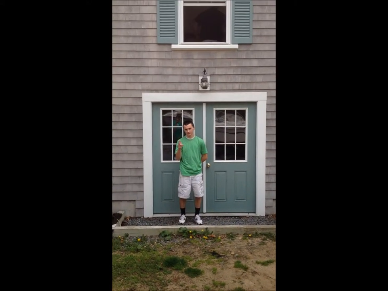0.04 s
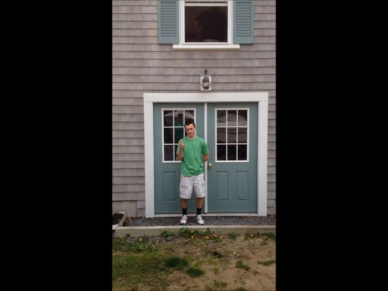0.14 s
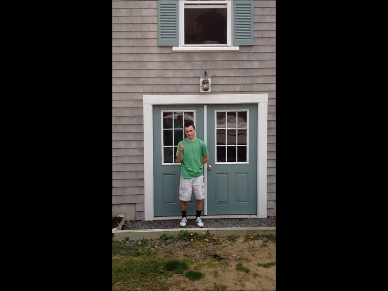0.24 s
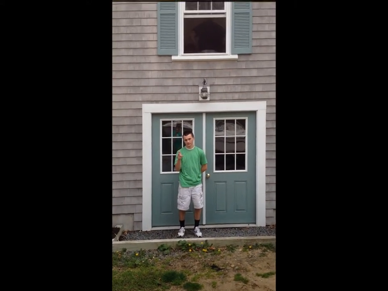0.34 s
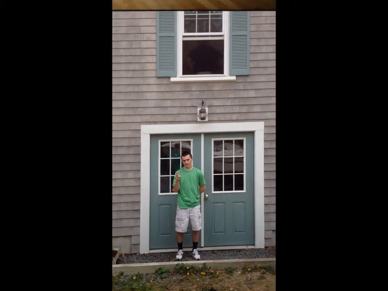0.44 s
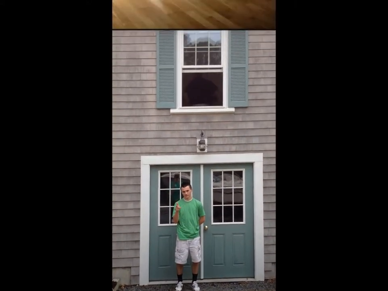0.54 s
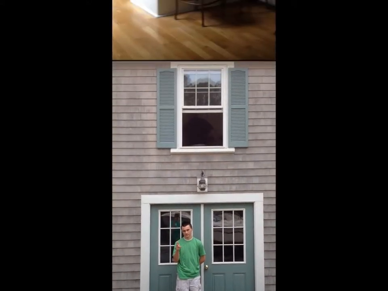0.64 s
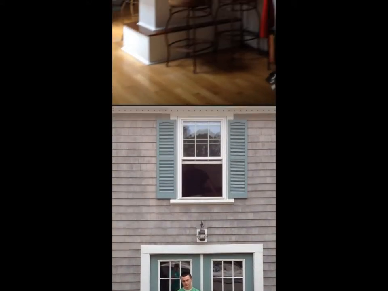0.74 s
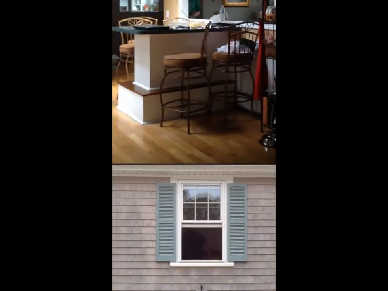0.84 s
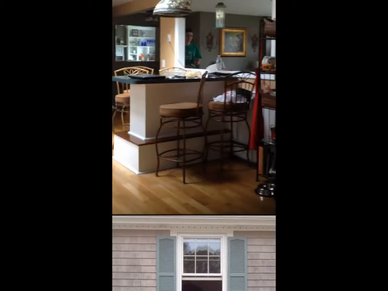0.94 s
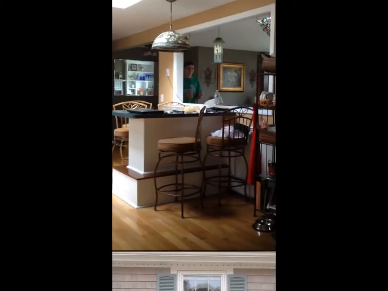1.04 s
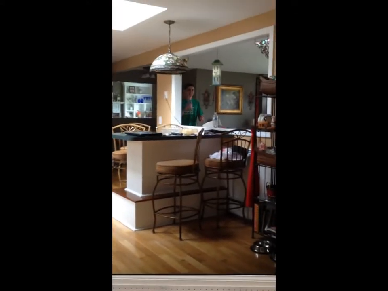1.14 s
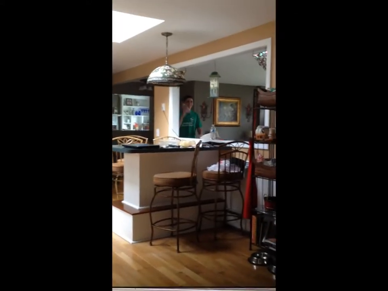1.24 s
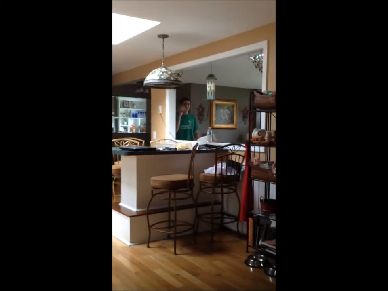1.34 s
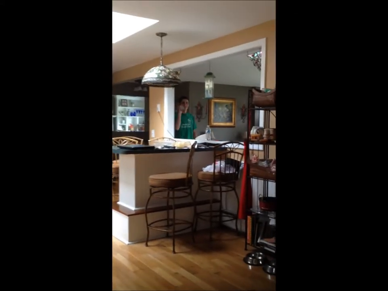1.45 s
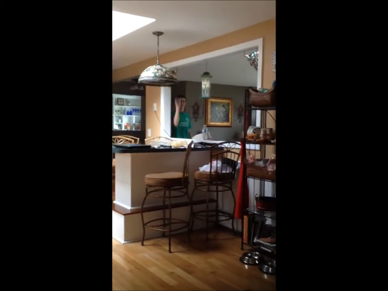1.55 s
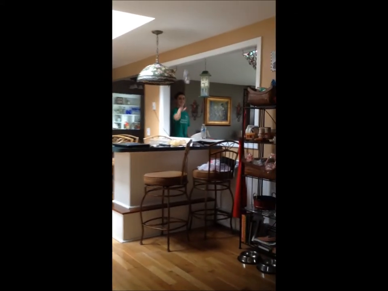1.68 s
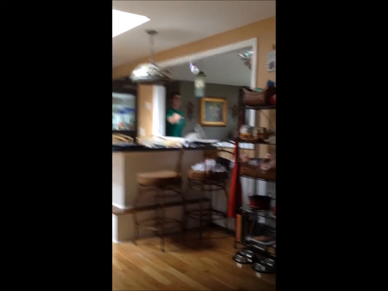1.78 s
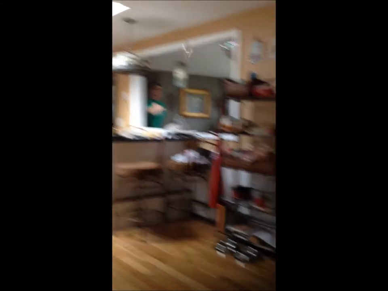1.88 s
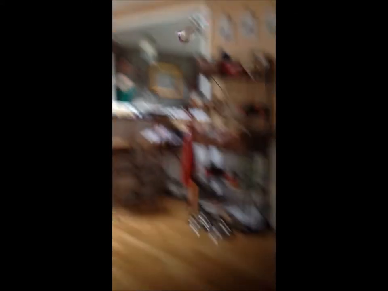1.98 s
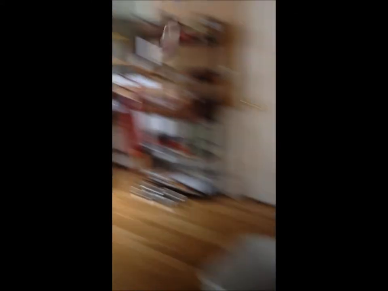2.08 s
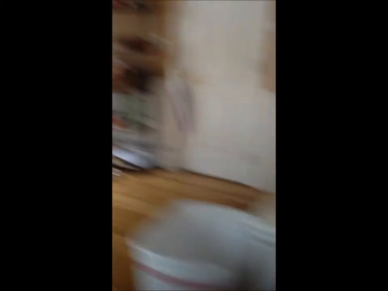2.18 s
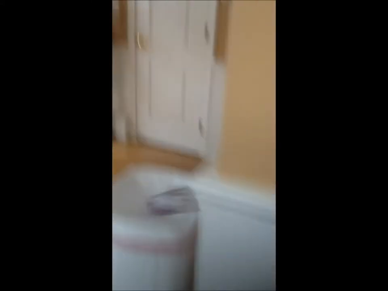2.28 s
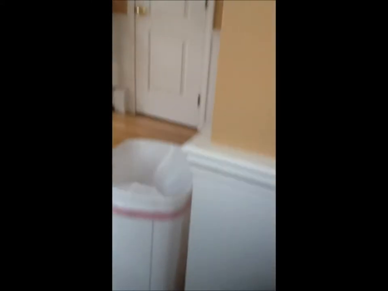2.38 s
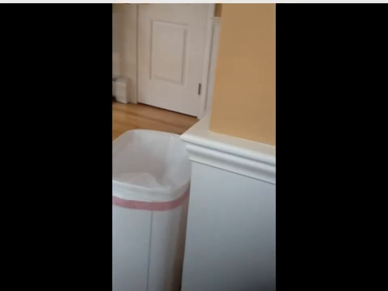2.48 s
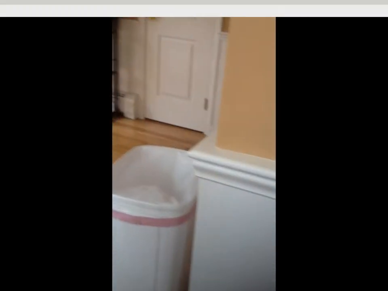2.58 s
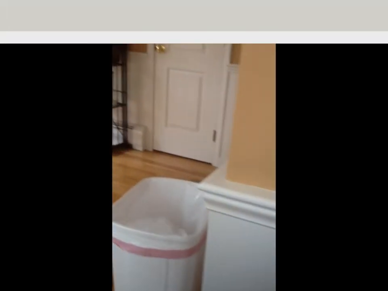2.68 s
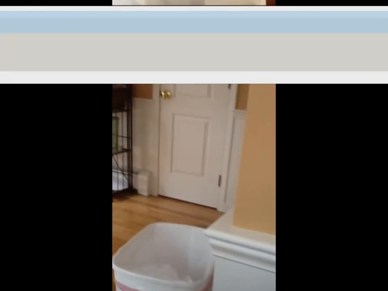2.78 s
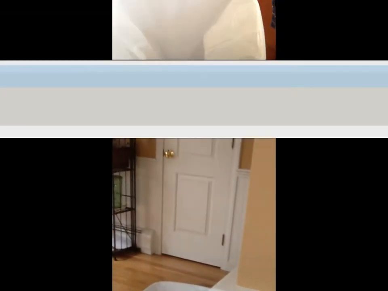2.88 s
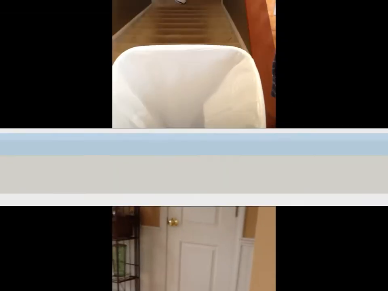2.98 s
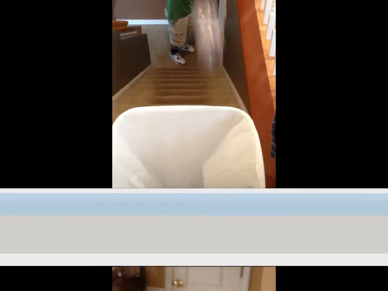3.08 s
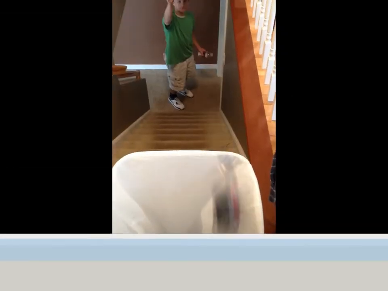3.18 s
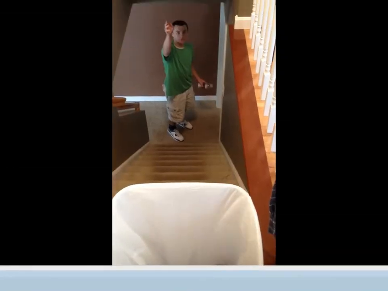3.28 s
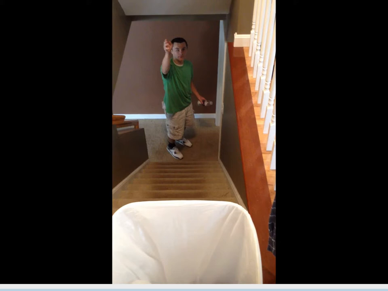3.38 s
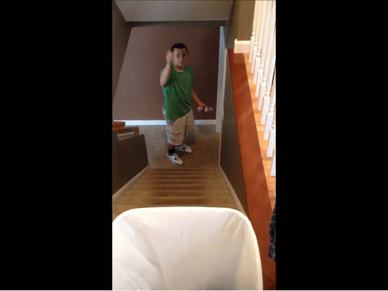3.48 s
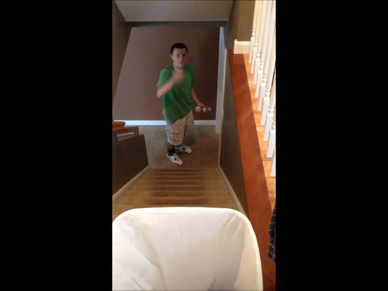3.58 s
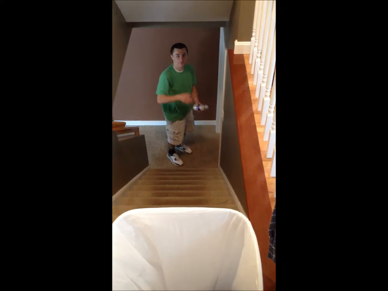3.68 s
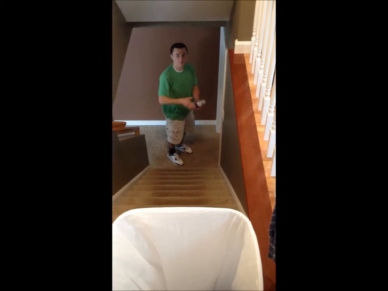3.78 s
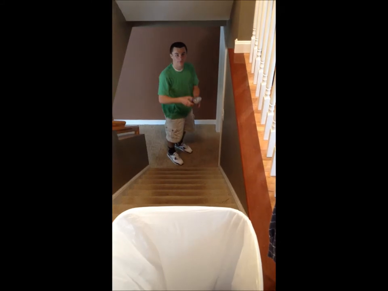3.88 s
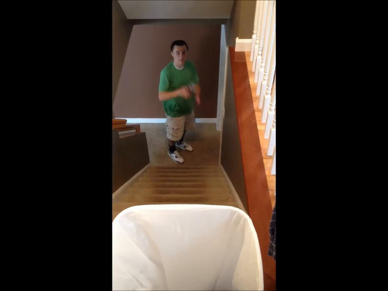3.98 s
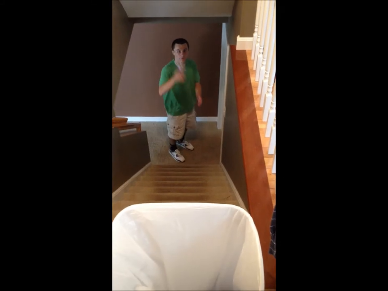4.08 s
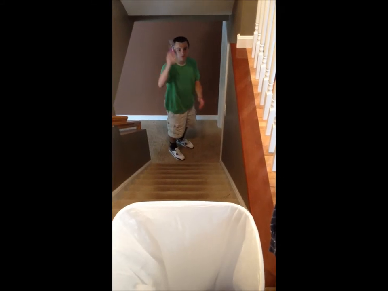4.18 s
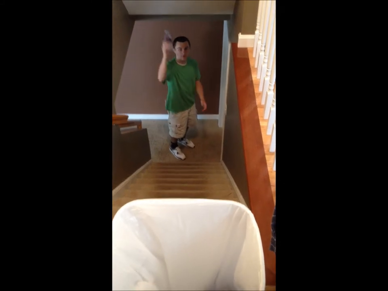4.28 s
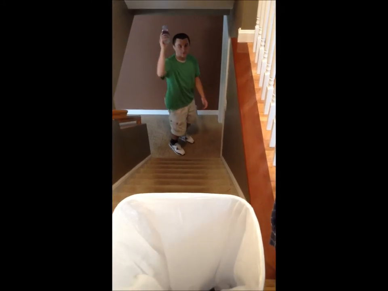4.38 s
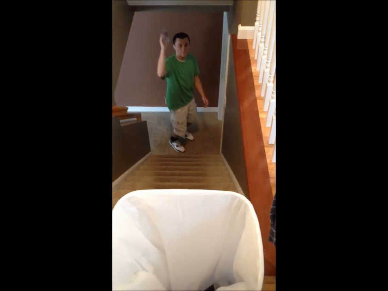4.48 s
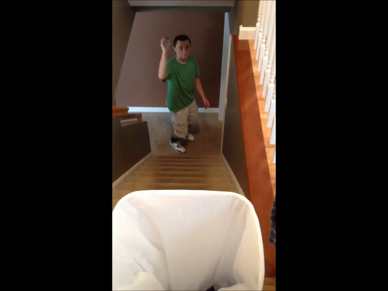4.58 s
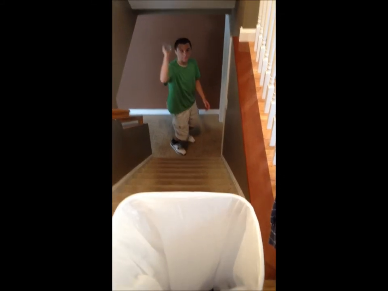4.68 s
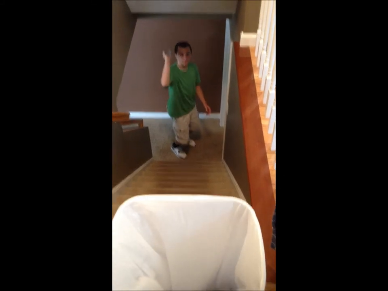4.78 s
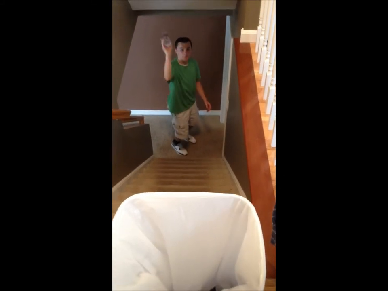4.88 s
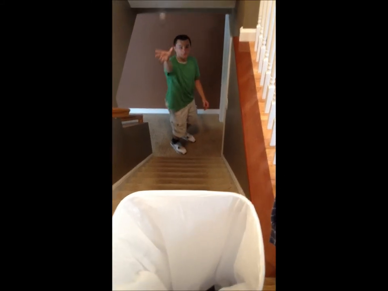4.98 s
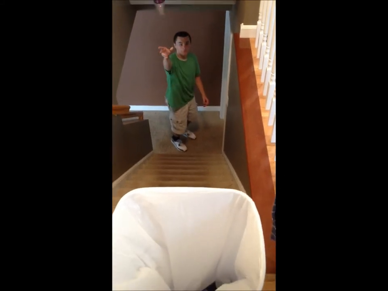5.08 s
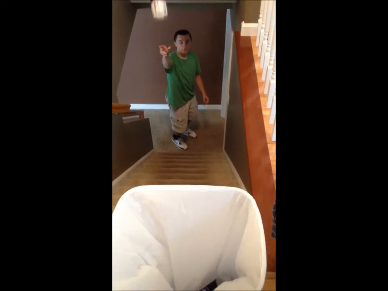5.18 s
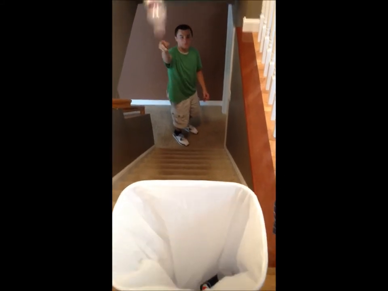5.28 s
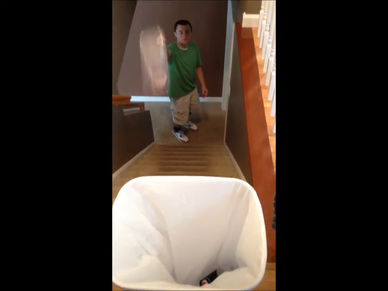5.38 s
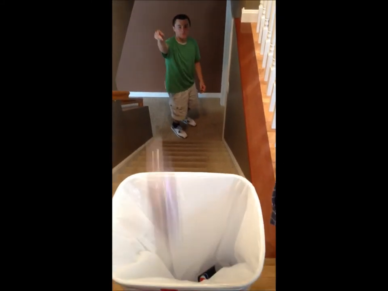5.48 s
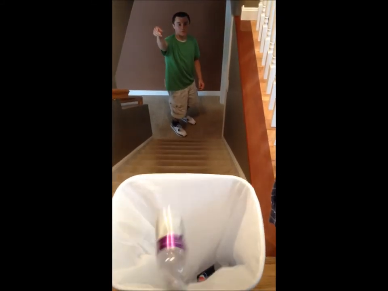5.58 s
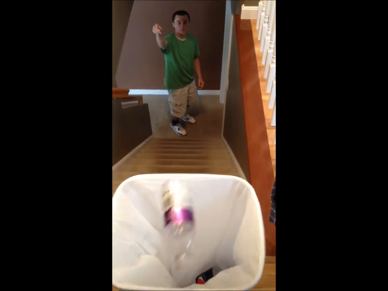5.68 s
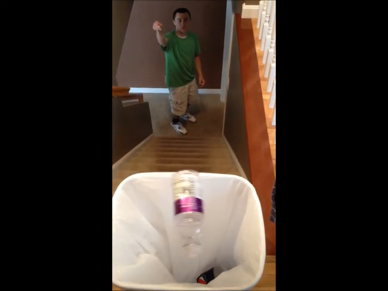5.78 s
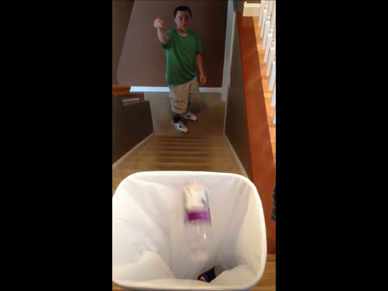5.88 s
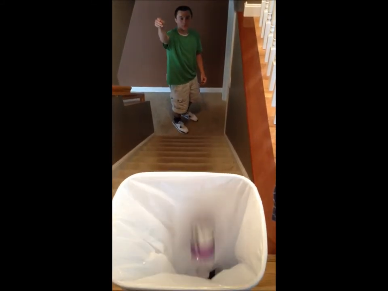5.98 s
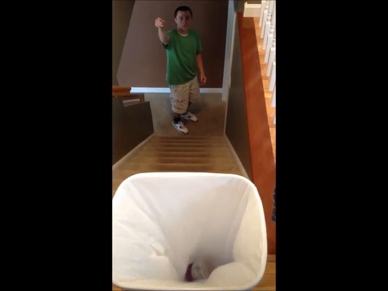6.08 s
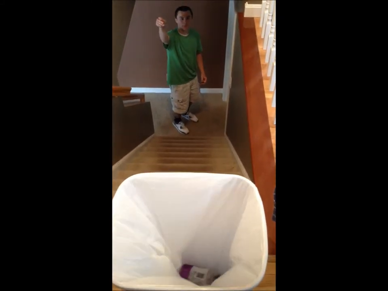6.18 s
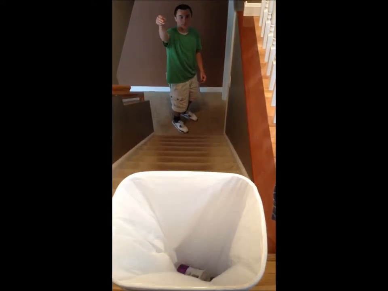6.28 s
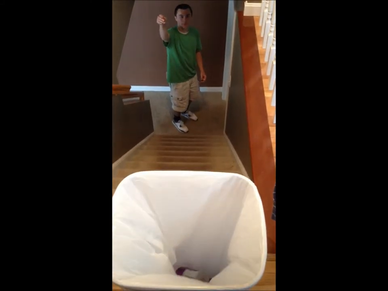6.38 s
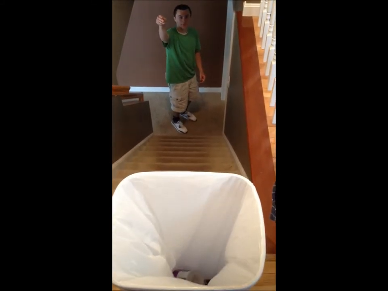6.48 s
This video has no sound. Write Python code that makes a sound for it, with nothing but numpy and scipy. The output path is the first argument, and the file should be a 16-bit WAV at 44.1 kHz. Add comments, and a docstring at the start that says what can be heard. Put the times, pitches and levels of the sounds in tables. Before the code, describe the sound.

Three thrown plastic bottles hit a kitchen bin close to a phone microphone: first a ringing knock cut short by the bag, then a hard double clack, and after a quiet gap of faint bottle crackles, a heavy boomy hit with a softer second landing. The thin liner crinkles at the blows. Faint chirps and cloth rustle come earlier; a quiet fan-like hum and hiss lie beneath, with short room echoes.

```python
"""Plastic bottles thrown into a bin

Plastic drink bottles are thrown across a house into a plastic kitchen bin lined with a bag: damped modes
and filtered noise bursts, each with a room tail. One glances off a ledge and rings before it drops in, one
strikes twice, one bounces up out of the bin and falls back. The bin's modes boom and grainy noise makes the
liner crinkle. Faint handling, cloth, chirps and hiss lie around; outdoor air gives way to an indoor hum."""
import sys
import numpy as np
from scipy import signal
from scipy.fft import rfft, irfft, next_fast_len
from scipy.io import wavfile
from scipy.ndimage import uniform_filter1d

SR = 44100
rng = np.random.default_rng(int(sys.argv[2]) if len(sys.argv) > 2 else 0)


def inscribe(sig):
    """Save sig as 16-bit PCM at rate SR to the path in sys.argv[1].

    A 1-D sig is mono; a 2-D sig holds one channel per row.
    Samples are clipped to [-1, 1] before scaling.
    """
    pcm = np.round(np.clip(np.atleast_2d(sig).T, -1, 1) * 32767)
    wavfile.write(sys.argv[1], SR, pcm.astype(np.int16))


N = 288810


def amp(db):
    """Decibels to gain."""
    return 10 ** (np.asarray(db) / 20)


def unit(x):
    """Scaled to rms 1."""
    return x / np.sqrt(np.mean(x ** 2) + 1e-20)


def along(points, hz):
    """(Hz, value) points interpolated on a log frequency axis."""
    point_hz, values = np.transpose(points)
    return np.interp(np.log(hz + 1), np.log(point_hz + 1), values)


def peaks(modes, hz):
    """Gain of resonances (Hz, width Hz, dB) added to a flat base of 1."""
    return 1 + sum(amp(db) / (1 + (2 * (hz - centre) / width) ** 2) for centre, width, db in modes)


def resonance(hz, centre_hz, q):
    """Gain of one broad resonance, 1 near its centre."""
    detune = (hz + 1) / centre_hz - centre_hz / (hz + 1)
    return (1 + (q * detune) ** 2) ** -.65


def coloured(x, gain):
    """x through the causal minimum-phase filter with this gain over frequency."""
    m = 2 * next_fast_len((len(x) + SR // 4) // 2)
    log_gain = np.log(np.maximum(gain(np.fft.rfftfreq(m, 1 / SR)), 1e-6))
    cepstrum = irfft(log_gain, m)
    # folding the cepstrum forward in time makes the filter minimum-phase
    cepstrum[1:m // 2] *= 2
    cepstrum[m // 2 + 1:] = 0
    response = np.exp(rfft(cepstrum))
    return irfft(rfft(x, m) * response, m)[:len(x)]


def add(track, start_s, sound):
    """Mix a sound into the track from start_s."""
    part = track[round(start_s * SR):][:len(sound)]
    part += sound[:len(part)]


def stretch(start_s, end_s, db, rise_db_per_s, fall_db_per_s):
    """Gain in dB ramps: a rise up to start_s and a fall after end_s; both apply where they overlap."""
    t = np.arange(N) / SR
    rise_db = abs(rise_db_per_s) * np.maximum(start_s - t, 0)
    fall_db = abs(fall_db_per_s) * np.maximum(t - end_s, 0)
    return amp(db - rise_db - fall_db)


def in_room(x, wet_db):
    """x plus a room answer: a noise tail, 5 ms late, each frequency dying at its own speed."""
    # Reverberation. Each row: frequency in Hz, t60 in s.
    room_t60 = [(100, 0.78), (300, .5), (1000, 0.54), (4500, 0.47), (9000, 0.73), (15000, .48)]
    hz, t, z = signal.stft(rng.standard_normal(SR), SR, nperseg=256)
    decay = amp(-60 * t / along(room_t60, hz)[:, None])
    tail = signal.istft(z * decay, SR, nperseg=256)[1]
    tail = np.pad(tail / np.linalg.norm(tail), (round(.005 * SR), 0))
    return x + amp(wet_db) * signal.fftconvolve(x, tail)[:len(x)]


def ring(modes, attack_s):
    """One second of damped modes (Hz, dB, t60 s) that swell in, with new random strengths at each strike."""
    t = np.arange(SR) / SR
    tone = np.zeros(SR)
    for hz, db, t60_s in modes:
        envelope = amp(db + rng.normal(0, .5) - 60 * t / t60_s)
        tone += envelope * np.sin(2 * np.pi * hz * t)
    return tone * (1 - np.exp(-t / attack_s))


def burst(t60_s, spike_db, grain_db):
    """A one-sample contact spike and the dying, clumped noise of thin plastic chatter."""
    t = np.arange(SR) / SR
    clumps = unit(amp(grain_db * unit(uniform_filter1d(rng.standard_normal(SR), size=40))))
    chatter = rng.standard_normal(SR) * clumps * amp(-60 * t / t60_s)
    chatter[0] += amp(spike_db)
    return chatter


def tick(centre_hz, octaves, t60_s):
    """One small contact in a band around its centre, with the room's answer."""
    band = lambda hz: 1 / (1 + (np.log2((hz + 1) / centre_hz) / octaves) ** 2) ** 2
    sound = coloured(burst(t60_s, spike_db=16, grain_db=-2.0), band)
    first_10_ms = sound[:SR // 100]
    return in_room(sound / first_10_ms.std(), wet_db=-8.0)


def hiss():
    """The microphone's own hiss: steady filtered noise."""
    # Hiss spectrum. Each row: frequency in Hz, relative density in dB.
    hiss_shape = [(100, -11), (200, 7.5), (600, 4.5), (2000, -2.5), (4600, -1), (5400, -4.5), (7400, 0.5),
                  (10200, -7), (13500, 2.5), (15500, -8)]
    level_db = -68
    return amp(level_db) * unit(coloured(rng.standard_normal(N), lambda hz: amp(along(hiss_shape, hz))))


def background():
    """Open air, then the fan-like hum of kitchen and stairwell: filtered noise, faded from one to the next."""
    # Air spectra. Each row: frequency in Hz, relative density in dB.
    outdoor_air = [(35, -41.5), (60, -24), (145, -10), (385, -7.5), (433, -6), (533, -12), (705, -5),
                   (1170, -8), (2050, -18), (3190, -23), (3760, -37.5), (15500, -35)]
    kitchen_air = [(35, -63), (60, -35.5), (130, -17), (220, -2), (413, -9), (546, -14), (869, -16.5),
                   (1070, -23), (2150, -27.5), (3400, -35), (5200, -37.5), (7400, -33), (10200, -45),
                   (13800, -28), (15500, -44.5)]
    stairwell_air = [(35, -67), (60, -53), (107, -25), (156, -21), (200, -9.5), (255, -10.5), (330, -15.5),
                     (464, -14.5), (600, -20), (1150, -27), (2400, -33.5), (4500, -35.5), (5400, -42),
                     (7400, -33), (10200, -42.5), (13500, -36), (15500, -47.5)]
    # Resonances over the air: low hum, and the microphone's hissy band near 4.6 kHz.
    # Each row: frequency in Hz, width in Hz, gain in dB.
    kitchen_peaks = [(206, 14, 3.5), (244, 18, -3.5), (4600, 400, 2)]
    stairwell_peaks = [(256.3, 16, 13.5), (185, 14, 3), (4600, 480, 2)]
    KITCHEN_FROM_S = .342
    # Fades of each air: fade-in ends in s, fade-out starts in s, level in dB, fade-in and fade-out in dB per s.
    in_yard = (1.05, 0.47, -54, 5.5, 17)
    in_kitchen = (KITCHEN_FROM_S, 3.43, -49.5, 500, 54)
    in_stairwell = (4, 7, -58, 29.5, 200)
    places = [(in_yard, outdoor_air, []),
              (in_kitchen, kitchen_air, kitchen_peaks),
              (in_stairwell, stairwell_air, stairwell_peaks)]
    out = np.zeros(N)
    for stay, air, resonances in places:
        colour = lambda hz: amp(along(air, hz)) * peaks(resonances, hz)
        out += stretch(*stay) * unit(coloured(rng.standard_normal(N), colour))
    return out


def chirps():
    """Far-off thin whistles: arched sines with random waver and flutter, blurred by the room tail."""
    # Each row: start in s, length in s, pitch at mid-length before waver in Hz, level in dB.
    chirp_rows = [(.01, 0.029, 3310, -66), (0.116, 0.064, 3090, -69), (0.485, 0.24, 3700, -64),
                  (1.259, 0.15, 3800, -65)]
    flutter_db = 5
    waver_share, bend_share = 0.022, 0.014  # of the pitch
    out = np.zeros(N)
    for start_s, length_s, hz, db in chirp_rows:
        u = np.linspace(0, 1, round(length_s * SR))
        waver = waver_share * unit(uniform_filter1d(rng.standard_normal(len(u)), size=200))
        flutter = unit(amp(flutter_db * unit(uniform_filter1d(rng.standard_normal(len(u)), size=600))))
        arch = np.sin(np.pi * u)
        pitch_hz = hz * (1 + waver + bend_share * (arch - 1))
        whistle = np.sin(2 * np.pi * np.cumsum(pitch_hz) / SR)
        add(out, start_s, amp(db) * arch * flutter * whistle)
    return in_room(out, wet_db=-5)


def rustle():
    """Cloth brushing softly near the microphone: filtered noise in smooth arches."""
    # Brushes. Each row: middle in s, length in s, peak level in dB.
    brushes = [(0.452, 0.35, -61), (.85, .3, -60.5), (1.138, 0.28, -66), (1.67, 0.13, -61), (2.2, .5, -61),
               (2.887, 0.42, -58.5)]
    # Cloth spectrum. Each row: frequency in Hz, relative density in dB.
    cloth_shape = [(500, -11), (2000, -5), (4500, 2), (5200, -2), (7500, 1), (10000, -6), (13500, -0.5),
                   (15500, -11)]
    t = np.arange(N) / SR
    swells = np.zeros(N)
    for middle_s, length_s, db in brushes:
        swells += amp(db) * np.cos(np.pi * np.clip((t - middle_s) / length_s, -.5, .5))
    return swells * unit(coloured(rng.standard_normal(N), lambda hz: amp(along(cloth_shape, hz))))


def handling():
    """Faint crackles and hollow taps of bottles gripped and let go: banded contact bursts."""
    # A bottle crackles in a hand some way off.
    # Each row: start in s, level in dB, centre in Hz, width in octaves, t60 in s.
    crackles = [(0.4628, -54.5, 3760, 0.75, 0.043), (.579, -60, 3400, .6, .04),
                (1.16, -63, 4080, 0.45, 0.037), (1.7513, -53.5, 2850, 0.61, .04),
                (1.761, -57.5, 2930, 0.46, 0.032), (1.9565, -62.5, 3970, 0.16, 0.035),
                (2.9711, -51, 1870, .89, 0.03), (3.8761, -46, 8100, 4.2, 0.12),
                (3.9348, -54.5, 2800, 2.1, 0.13), (3.972, -53.5, 3975, 3, 0.14),
                (4.045, -60, 4060, 1.5, .067), (4.1168, -56, 4490, 1.9, .06),
                (4.3152, -51.5, 7000, 1.6, .062), (4.486, -56, 6000, 1.8, 0.054),
                (4.8052, -56.5, 7050, 1.8, 0.27), (4.881, -58.5, 4000, 2.8, 0.12),
                (4.97, -52, 4400, 3.1, 0.24), (5.364, -60, 5520, 1.37, .06)]
    # A light tap on a bottle's hollow side. Each row: start in s, level in dB.
    taps = [(3.877, -56.5), (3.936, -58.5), (4.316, -65), (4.983, -50), (6.0, -46)]
    tap_hz, tap_octaves, tap_t60_s = 725, 0.49, 0.14
    out = np.zeros(N)
    for start_s, db, centre_hz, octaves, t60_s in crackles:
        add(out, start_s, amp(db) * tick(centre_hz, octaves, t60_s))
    for start_s, db in taps:
        add(out, start_s, amp(db) * tick(tap_hz, tap_octaves, tap_t60_s))
    return out


def liner():
    """Dense tiny crinkles of the bag's film: clumped, filtered noise under quick rises and slower falls."""
    # Swells of bright crinkly noise around the blows.
    # Each row: start in s, length in s, level in dB, fall in dB per s.
    crinkle_swells = [(2.447, 0.038, -36, 72.5), (3.245, 0.017, -31, 130.5), (3.412, .18, -43.5, 85),
                      (5.611, 0.067, -48, 172), (5.943, .075, -42.5, 169), (6.095, .04, -35.5, 83),
                      (6.405, 0.15, -50, 60)]
    # Film spectrum. Each row: frequency in Hz, relative density in dB.
    film_shape = [(290, -42.5), (500, -13.5), (737, -10.5), (997, -17.5), (1470, -10), (1820, -13.5),
                  (3100, -13.5), (4700, -7), (5200, -15), (13000, -11.5), (15500, -23)]
    rise_db_per_s = 559
    gains = [stretch(start_s, start_s + length_s, db, rise_db_per_s, fall_db_per_s)
             for start_s, length_s, db, fall_db_per_s in crinkle_swells]
    envelope = np.linalg.norm(gains, axis=0)
    folds = amp(2.2 * unit(uniform_filter1d(rng.standard_normal(N), size=60)))
    crinkle = unit(coloured(folds * rng.standard_normal(N), lambda hz: amp(along(film_shape, hz))))
    return envelope * crinkle


def bin_thuds():
    """A bottle's weight lands: the bin's panels answer fast, the boom of its cavity builds more slowly."""
    # Landings. Each row: start in s, boom gain in dB, wall gain in dB.
    thuds = [(2.290, -31.5, -48), (2.408, -22, -24.5), (2.440, -19.5, -22), (3.218, -21, -24),
             (3.325, -29, -28.5), (5.6152, -10.5, -7), (6.105, -18, -19), (6.129, -30.5, -50),
             (6.185, -30, -37), (6.424, -35.5, -34.5)]
    # Modes of the air in the bin and its base. Each row: frequency in Hz, relative level in dB, t60 in s.
    boom_modes = [(136.3, -5.5, 0.22), (184.8, -1.85, 0.31), (211.9, 2, 0.18), (242.5, -3, 0.26)]
    # Modes of the side panels. Each row: frequency in Hz, relative level in dB, t60 in s.
    wall_modes = [(329.8, -5, 0.24), (375, -5, 0.21), (412, 8, 0.078), (461, -12, 0.17), (533, -14.5, 0.37)]
    out = np.zeros(N)
    for start_s, boom_db, wall_db in thuds:
        boom = amp(boom_db) * ring(boom_modes, attack_s=0.0089)
        wall = amp(wall_db) * ring(wall_modes, attack_s=0.0025)
        add(out, start_s, in_room(boom + wall, wet_db=-10))
    return out


def ringing_bottle():
    """A hollow note of damped modes from the glancing blow, smothered when the bottle enters the bag."""
    # The hollow note. Each row: frequency in Hz, relative level in dB, t60 in s.
    bottle_modes = [(511.6, -3.5, 1.3), (493, -5, 0.82), (445, -2, 0.18), (957, -18.5, 0.13),
                    (1030, -12.5, 0.32)]
    ring_s, bag_s, ring_db = 2.289, 2.405, -8
    catch_s, catch_db, smother_db_per_s = .011, -6.5, 130.5  # quick drop on top of steady damping
    out = np.zeros(N)
    in_bag_s = np.maximum(np.arange(SR) / SR + ring_s - bag_s, 0)
    catch = catch_db * np.minimum(in_bag_s / catch_s, 1)
    smother = amp(catch - smother_db_per_s * in_bag_s)
    note = amp(ring_db) * ring(bottle_modes, attack_s=0.0055) * smother
    add(out, ring_s, in_room(note, wet_db=-15))
    return out


def bottles():
    """Each blow shakes the shell; force sets the body's pitch, the spot that hits the clack and brightness."""
    # Bottle strikes. Each row: start in s, body gain in dB, clack gain in dB, clack frequency in Hz,
    # snap gain in dB, crack gain in dB, chatter t60 in s.
    blows = [(2.2876, 6, -5, 975, -14.5, -10.5, 0.31), (2.4076, -2, -10.5, 1200, -18.5, -24, 0.15),
             (2.433, -4, -17.5, 1200, -27, -32.5, 0.42), (2.5655, -15, -12, 846, -24.5, -38.5, .08),
             (2.62, -20.5, -21.5, 670, -38.5, -51.5, 0.41), (3.1976, 2.5, 5, 1485, -11.5, -19, .093),
             (3.222, 4.5, -9, 947, -26, -30.5, 0.17), (3.2992, 6, 5.5, 1070, -5.5, -13.5, 0.11),
             (3.312, 4, 5, 768, -29, -30, 0.19), (5.590, -24, -36, 1603, -39, -33.5, 0.1155),
             (5.5980, 1.5, -5.5, 1110, -2.5, -13.5, 0.086), (5.613, 7, -20, 674, -12, -24.5, 0.053),
             (5.666, 2.5, -17.5, 1430, -36, -34, .16), (6.0922, -24, -12, 1064, -25, -30.5, 0.22),
             (6.1040, -0.5, -5, 1010, -28, -28.5, 0.223), (6.141, -9, -19, 1090, -26.5, -29, 0.15),
             (6.187, -8, -18, 1010, -46, -41.5, 0.14), (6.4245, -10.5, -27, 1830, -53, -52, .11)]
    # Modes of the thin shell. Each row: frequency in Hz, relative level in dB, t60 in s.
    shell_modes = [(691, -18, 0.24), (758.3, -11, 0.1), (954, -19, 0.18), (1163, -13.5, 0.17),
                   (1428, -13.5, 0.17), (1820, -24, 0.44), (2175, -18, 0.14), (2500, -14, 0.15),
                   (2640, -17, 0.12), (2970, -12.5, 0.17), (4500, -7, 0.12), (4600, -13.5, 0.09),
                   (6374, -17, 0.12), (6900, -23.5, 0.18)]
    # Resonances that colour the blows: the shell's, and the microphone's near 4.7 kHz.
    # Each row: frequency in Hz, width in Hz, gain in dB.
    colour_bands = [(2680, 660, -5.5), (4720, 150, -0.5), (6900, 1100, -4.5), (11800, 1000, -5)]
    # body pitch in a 0 dB blow; a harder blow is shorter and so sounds higher
    base_body_hz, body_db_per_octave = 386, 60.5
    snap_hz, crack_hz = 4062, 7400  # stiff neck, thin film of the bottle
    out = np.zeros(N)
    for start_s, body_db, clack_db, clack_hz, snap_db, crack_db, t60_s in blows:
        body_hz = base_body_hz * 2 ** (body_db / body_db_per_octave)
        # gain in dB, centre in Hz, sharpness
        parts = [(body_db, body_hz, 1.5), (clack_db, clack_hz, 1.7),
                 (snap_db, snap_hz, 3), (crack_db, crack_hz, 1.1)]

        def colour(hz):
            """Power sum of the four resonances, lifted by the colour bands."""
            gains = [amp(db) * resonance(hz, centre_hz, q) for db, centre_hz, q in parts]
            return np.linalg.norm(gains, axis=0) * peaks(colour_bands, hz)

        chatter = amp(-1) * burst(t60_s, spike_db=10, grain_db=2.5)
        shell = amp(-11.5) * ring(shell_modes, attack_s=0.00074)
        add(out, start_s, in_room(coloured(chatter + shell, colour), wet_db=-9.5))
    return out


def scene():
    """All sources at one microphone."""
    faint = hiss() + background() + chirps() + rustle() + handling()
    return (faint + liner() + bin_thuds() + ringing_bottle() + bottles())[None]


def record(dry):
    """The phone thins the deep bass, rounds off the highest peaks and keeps nothing above its band limit."""
    top_hz = 15450  # middle of a 300 Hz wide cutoff slope
    response = [(30, -6.0), (75, -7), (125, 2.0), (13500, -1.5), (15500, -3.5)]  # Hz, dB
    thin = coloured(dry[0], lambda hz: amp(along(response, hz)))
    held = thin / (1 + np.abs(thin) ** 6) ** (1 / 6)
    m = next_fast_len(N + SR // 4)
    band_limit = np.clip((top_hz - np.fft.rfftfreq(m, 1 / SR)) / 300 + .5, 0, 1)
    return irfft(rfft(held, m) * band_limit, m)[None, :N]


dry = scene()
out = record(dry)
inscribe(out)
```